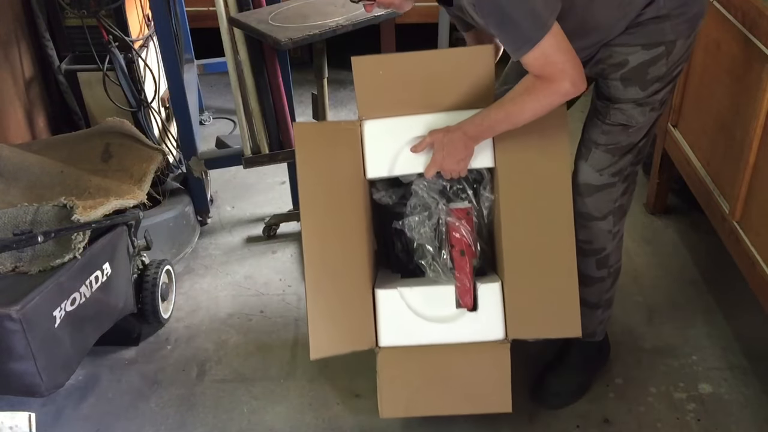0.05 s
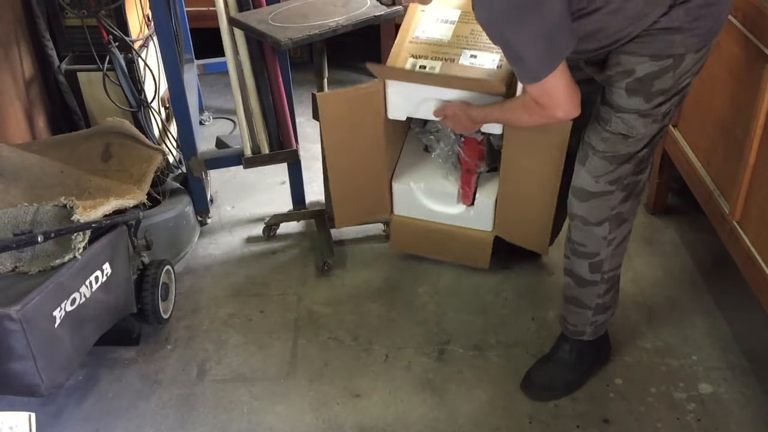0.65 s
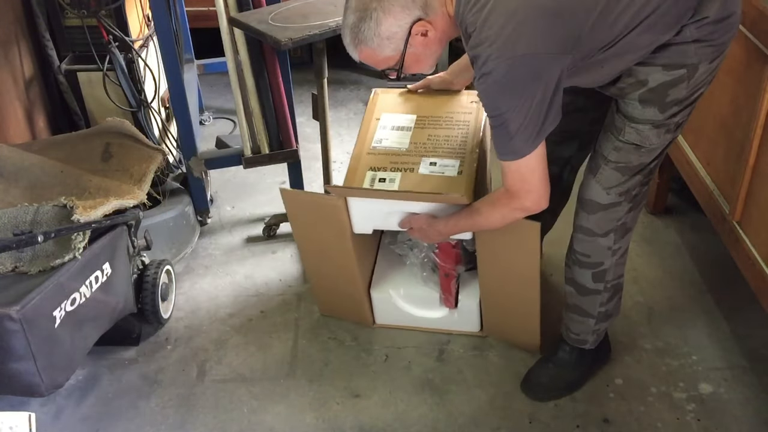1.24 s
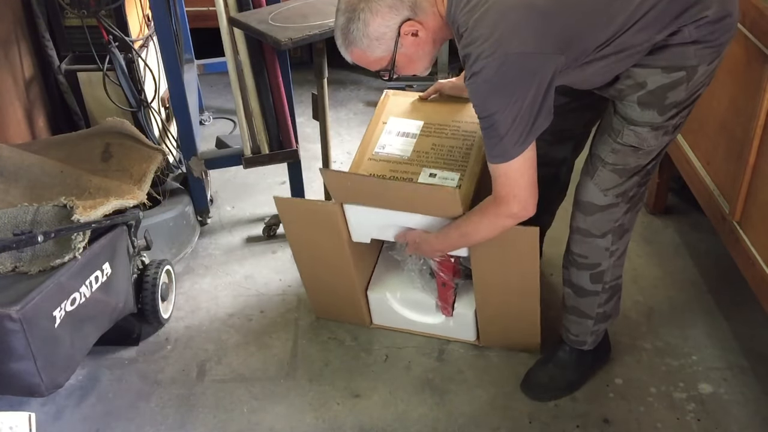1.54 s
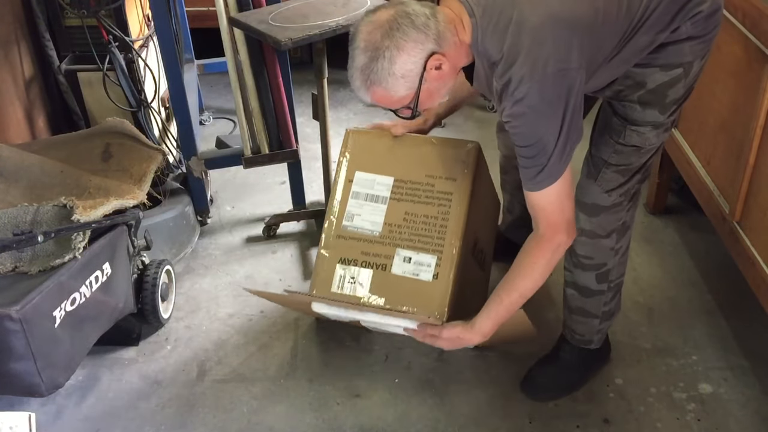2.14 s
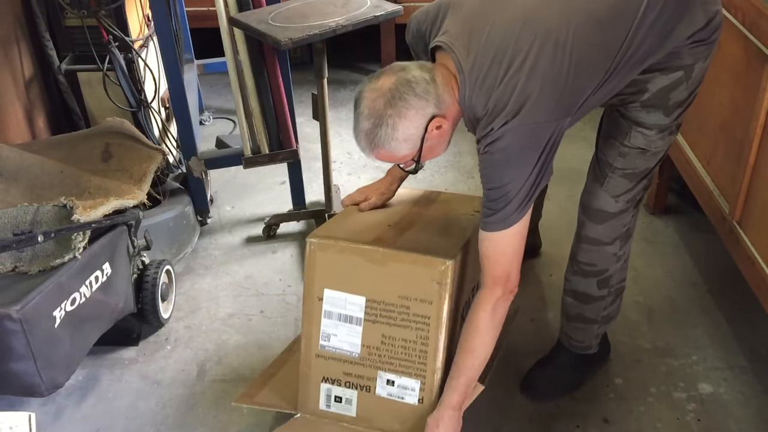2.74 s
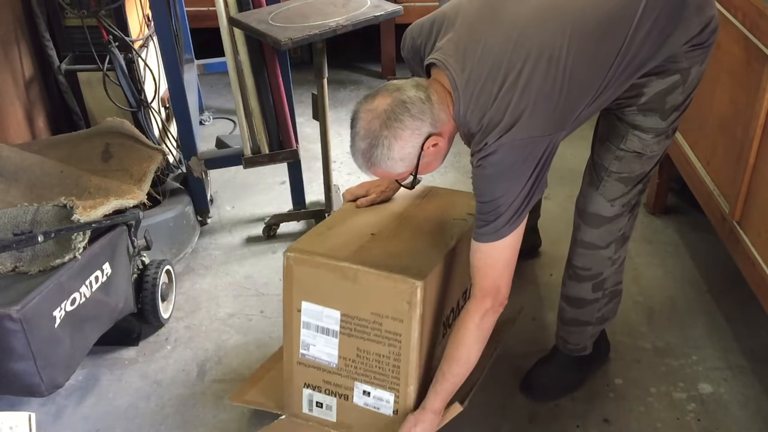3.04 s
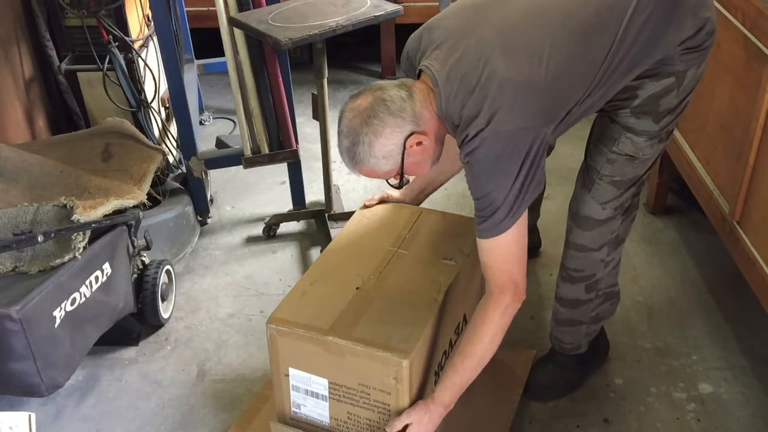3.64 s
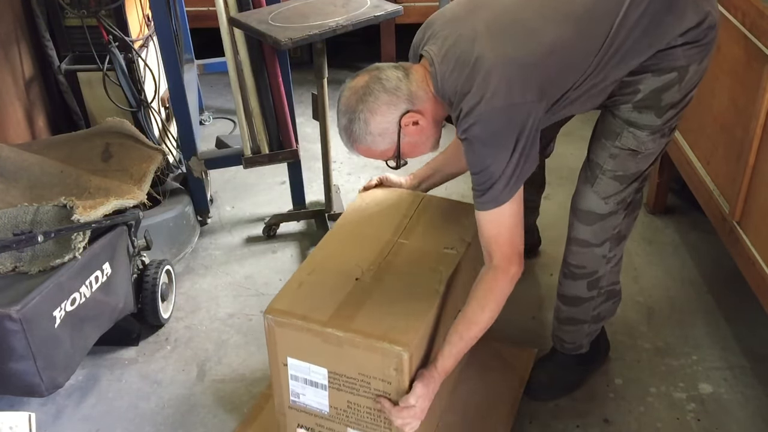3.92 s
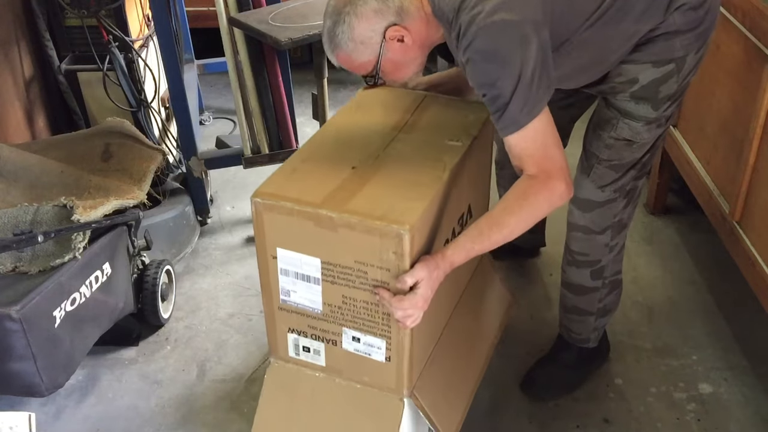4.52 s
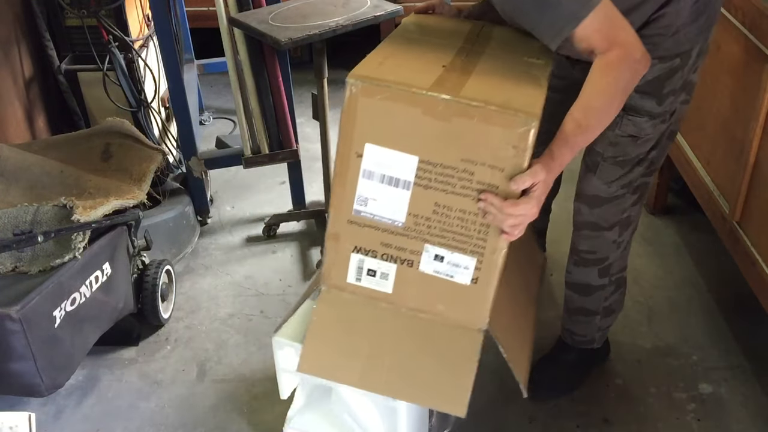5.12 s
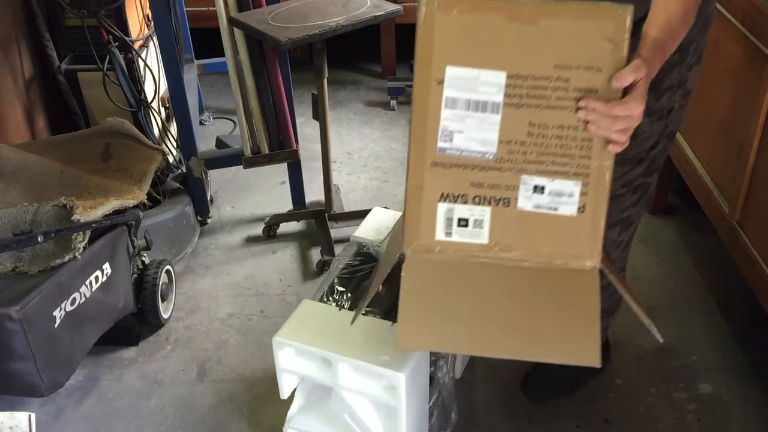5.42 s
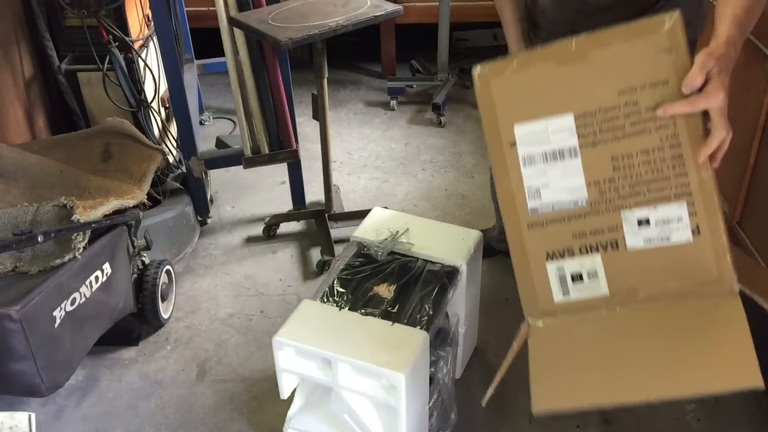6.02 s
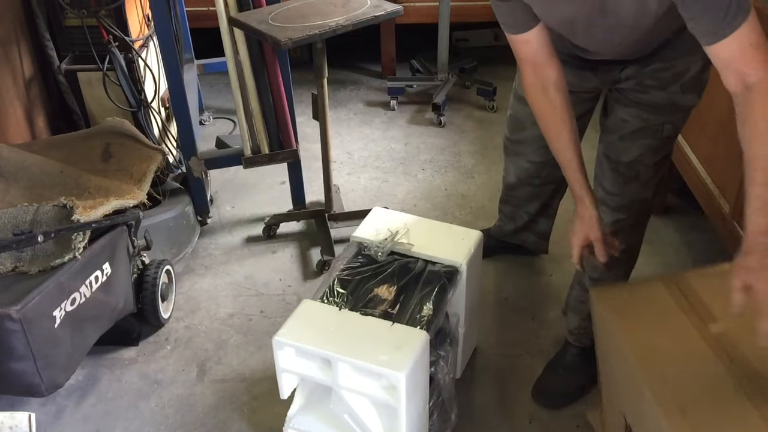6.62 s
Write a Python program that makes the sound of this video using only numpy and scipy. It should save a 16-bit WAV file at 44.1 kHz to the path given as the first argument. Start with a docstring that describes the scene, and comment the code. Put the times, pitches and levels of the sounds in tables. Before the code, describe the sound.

Close up in a small room, cardboard drags on concrete with dry rasps, knocks and sharp cracks as a packed box is turned over. Two heavy thumps stand out as the contents settle, followed by a rubbing hiss of foam sliding out of the box. Faint, thin high tones flutter briefly, the handling goes quiet, and the empty carton lands with a scrape and a few dull, hollow bumps.

```python
"""Unpacking a machine

A machine packed in polystyrene foam is tipped over in its carton on a workshop floor, and the carton is
pulled off. Flaps scrape on concrete and foam hisses along cardboard: countless tiny slips blur into
noise. The settling load thumps the walls, stiff edges snap, and the empty carton is set down.
Thin, high tones flutter briefly near the end. One close microphone, a small room."""
import sys
import numpy as np
from scipy import signal
from scipy.fft import rfft, irfft, next_fast_len
from scipy.io import wavfile
from scipy.ndimage import uniform_filter1d, map_coordinates

SR = 44100
rng = np.random.default_rng(int(sys.argv[2]) if len(sys.argv) > 2 else 0)


def generate_wav(sig):
    """Save sig (samples, or channels by samples) to the path in sys.argv[1] as 16-bit PCM at SR."""
    pcm = np.round(np.clip(np.atleast_2d(sig).T, -1, 1) * 32767).astype(np.int16)
    wavfile.write(sys.argv[1], SR, pcm)


N = 302509
TOP_HZ = 15800
TIME = np.arange(N) / SR
AGE = np.arange(SR // 2) / SR  # seconds since one short sound began
PUSH_TIME = np.arange(N * 1000 // SR + 2) / 1000  # pushes change slowly: one step a millisecond


def amp(db):
    """Turn decibels into a gain."""
    return 10 ** (np.asarray(db) / 20)


def unit(x):
    """Scale a sound to an average power of 1."""
    return x / np.sqrt(np.mean(x ** 2) + 1e-20)


def along(points, hz):
    """Read between (frequency, value) points on a log frequency axis."""
    f, values = np.transpose(points)
    return np.interp(np.log(hz + 1), np.log(f + 1), values)


def wobble(rate):
    """A smooth curve through `rate` random values a second."""
    return map_coordinates(rng.standard_normal(int(N * rate / SR) + 4), [TIME * rate])


def filtered(x, response):
    """Scale and delay each frequency f of a sound by response(f)."""
    size = next_fast_len(len(x) + SR // 4)
    return irfft(rfft(x, size) * response(np.fft.rfftfreq(size, 1 / SR)), size)[:len(x)]


def resonance(f, hz, width):
    """The response of something that rings at hz, with gain 1 there."""
    return 1j * f * width / (hz * hz - f * f + 1j * f * width)


def add(track, start, sound):
    """Mix a sound into the track, `start` seconds in."""
    part = track[max(0, round(start * SR)):][:len(sound)]
    part += sound[:len(part)]


def stroke(start, rise, hold, fade):
    """The gain of one push or swell: it rises, holds, then drops 20 dB in each fade time."""
    age = PUSH_TIME - start
    speed = np.sin(np.pi / 2 * np.clip(age / rise, 0, 1)) ** 2
    return speed * amp(-20 * np.clip((age - rise - hold) / fade, 0, 10))


# the tone of the workshop's still air: f/Hz, relative level/dB
AIR_TONE = [(15, -48), (25, -2.5), (64, 12), (216, -0.5), (449, -14.5), (812, -16), (2200, -31),
            (3880, -19), (4950, -29), (5980, -21), (15800, -20)]
def air():
    """Still air makes a faint, steady noise, mostly low."""
    return amp(-68.0) * unit(filtered(rng.standard_normal(N), lambda f: amp(along(AIR_TONE, f))))


# how long the room rings: f/Hz, time to fade by 60 dB (t60)/s
ROOM_DECAY = [(100, 0.91), (300, 0.41), (1000, 0.3), (4000, 0.13), (14000, 0.3)]
def room_echo(sound, early_db, early_t60):
    """The echo of a sound: floor and near furniture answer first, then the whole workshop."""
    hz, t, spectrum = signal.stft(rng.standard_normal(len(AGE)), SR, nperseg=256)
    decay = amp(-60 * t / along(ROOM_DECAY, hz)[:, None])
    tail = signal.istft(spectrum * decay, SR, nperseg=256)[1][:len(AGE)]
    tail = tail * (1 + amp(early_db - 60 * AGE / early_t60)) * (AGE > .002)
    return signal.fftconvolve(sound, tail / np.linalg.norm(tail))[:len(sound)]


# thin, high tones: f/Hz, relative level/dB, start/s, end/s
HIGH_TONES = [(3000, -59, 5.52, 5.62), (3970, -59, 5.55, 5.62), (4390, -59, 5.41, 5.63),
              (5580, -49.5, 5.48, 5.62), (6110, -52.5, 5.45, 5.65), (8920, -55.5, 5.42, 5.54),
              (9700, -59.5, 5.42, 5.64), (10200, -58, 5.54, 5.63), (11430, -56.5, 5.41, 5.62),
              (11972, -57, 5.54, 5.62), (12941, -65, 5.4, 5.62), (14100, -66, 5.48, 5.62),
              (14950, -61, 5.5, 5.61)]
def high_tones():
    """Thin, high tones with a raspy edge flutter briefly near the end."""
    track = np.zeros(N)
    rise_s = 0.023
    for hz, db, start, end in HIGH_TONES:
        swell = np.interp(AGE, PUSH_TIME, stroke(0, rise_s, hold=end - start - rise_s, fade=0.043))
        tone = np.sin(2 * np.pi * hz * AGE)
        rasp = unit(filtered(rng.standard_normal(len(AGE)), lambda f: resonance(f, hz, width=220) ** 3))
        flutter_db = 3 * wobble(55.6)[:len(AGE)]
        add(track, start, amp(db - 1 + flutter_db) * swell * (tone + amp(-5) * rasp))
    return track


# hollow scuffs of the flaps: t/s, hold/s, level/dB, f/Hz
FLAP_SCUFFS = [(0.07, 0.11, -53, 1258), (0.447, .07, -49, 2436), (0.9, 0.11, -43, 1360),
               (1.475, 0.028, -40.5, 1340), (1.935, 0.014, -48, 1074), (2.32, 0.018, -42.5, 1100),
               (2.719, 0.032, -45.5, 890)]
def scuffs():
    """A dragged edge chatters and makes its flap ring; each flap has its own pitch."""
    track = np.zeros(N)
    width_hz, overtone = 75, 1.8
    for start, hold, db, hz in FLAP_SCUFFS:
        chatter = rng.standard_normal(len(AGE))
        flap = lambda f: resonance(f, hz, width_hz) - amp(-8.5) * resonance(f, overtone * hz, width_hz)
        swell = np.interp(AGE, PUSH_TIME, stroke(0, rise=0.021, hold=hold, fade=0.1))
        add(track, start, amp(db) * swell * unit(filtered(chatter, flap)))
    return track


# the notes the carton's panels ring at: f/Hz, relative level/dB, t60/s
PANEL_NOTES = [(65.6, 4.5, 0.027), (139, 1, 0.13), (164.6, -5, 0.16), (194.8, 0, 0.088), (263, 2, 0.094),
               (331.6, -6, 0.22), (358.4, 3.5, 0.085), (458, -6, 0.087), (594, -0.5, 0.14),
               (703, -1.5, 0.1), (842, -3, 0.12), (1027, 0, 0.13), (1347, -3.5, 0.13)]
# soft, heavy blows: t/s, peak level/dB, f/Hz, bandwidth as a multiple of f, echo/dB
LOAD_THUMPS = [(0.001, -36.5, 328, 0.53, -5), (0.216, -41, 330, 2, 4), (0.365, -50, 300, 2.2, 4),
               (0.498, -34, 400, 1.4, 2), (0.975, -33, 242, 0.48, -6), (1.008, -26.5, 223, 0.75, -5.5),
               (1.022, -29.5, 626, 0.35, -7), (1.112, -27, 261, 1.1, -17), (1.173, -27, 215, 1.1, 2),
               (1.235, -26.5, 620, 0.85, -7), (1.249, -23.5, 300, 1.7, -8), (1.368, -30.5, 353, 0.88, -8),
               (1.492, -24, 376, 0.96, -7.5), (1.8, -42, 277, 0.36, 6), (2.005, -41, 190, 0.77, -4),
               (2.87, -36, 273.5, 2.1, 2), (3.345, -29, 250, 1.8, 0), (3.386, -14, 268, 2.04, 1),
               (3.43, -22, 131, 1.6, -1), (3.508, -28, 126, 1.2, -16), (3.74, -30, 228, 1.4, -8),
               (3.878, -42.5, 150, 0.81, -6), (3.948, -14, 360, 2, -16), (3.949, -20.5, 160, 0.71, -19),
               (4.012, -25, 220, 1.2, -8), (4.04, -29, 270, 1.2, -8), (4.457, -20, 392, 1.1, -11),
               (4.685, -40.5, 129, 1.5, -1), (4.755, -27.5, 800, 1.5, -3.5), (5.089, -50.5, 453, 1.92, 5),
               (5.403, -36.5, 450, 2, 9), (5.46, -36, 250, 2.1, 6), (5.524, -27.5, 310, 2.2, 2.5),
               (6.116, -41, 165, 2.1, 2), (6.178, -38.5, 531, 1.08, 4), (6.302, -46, 79.6, 1.9, -9),
               (6.648, -24, 200, 0.99, 0.5), (6.769, -19, 220, 2.1, 3.5), (6.802, -13, 131, 1.4, -7),
               (6.842, -14.5, 177, 2, -7)]
def thumps():
    """The load shifts against the walls: panels ring, board crushes, and a softer blow sounds lower."""
    track = np.zeros(N)
    attack = 1 - np.exp(-AGE / 0.00035)
    for start, db, hz, breadth, echo_db in LOAD_THUMPS:
        # one blow starts every note at once, neighbours in opposite directions
        ring = np.zeros(len(AGE))
        for k, (note_hz, note_db, t60) in enumerate(PANEL_NOTES):
            decay = amp(note_db + rng.normal(0, 4.26) - 60 * AGE / t60)
            ring += (-1) ** k * decay * np.sin(2 * np.pi * note_hz * AGE)
        crush = amp(22.0 - 60 * AGE / 0.091) * rng.standard_normal(len(AGE))
        blow = filtered((ring + crush) * attack, lambda f: resonance(f, hz, breadth * hz) ** 2)
        blow = blow + amp(echo_db) * room_echo(blow, early_db=3.5, early_t60=0.19)
        add(track, start, amp(db) * blow / np.abs(blow).max())
    return track


def panels(f, width_hz, ring_db):
    """Cardboard boosts the frequencies near its panels' notes."""
    peaks = sum(amp(db) * abs(resonance(f, hz, width_hz)) ** 2 for hz, db, _ in PANEL_NOTES)
    return 1 + amp(ring_db) * peaks


# hard knocks of flaps and foam: t/s, crack level/dB, f/Hz, bandwidth as a multiple of f, echo/dB
EDGE_SNAPS = [(1.107, -16.5, 3840, 0.98, 7), (1.376, -16.5, 3500, 0.99, 2.5), (1.483, -13, 2800, 0.21, 0.5),
              (1.4859, -14, 1290, 0.48, -2), (1.509, -19, 5500, .5, -6.5), (1.7575, -22, 4260, 1, 0),
              (1.914, -34, 2280, 0.98, 4), (1.952, -27, 1330, 0.63, 0.5), (2.104, -19.5, 3610, 0.26, -8),
              (3.729, -33.5, 3030, 1, 11), (3.947, -8.5, 1200, 0.25, -6), (3.9472, -11, 3160, 0.5, -2),
              (3.949, -17, 1033, 0.034, -13.5), (3.96, -19, 1100, 0.8, 4), (3.979, -20, 850, 0.74, -3.5),
              (3.998, -22, 1200, 0.76, 3.5), (4.77, -25, 2345, 0.39, 3), (5.404, -48, 1100, 1, -2),
              (6.117, -45, 3050, .73, 10), (6.28, -35, 5500, 0.94, 1.5), (6.649, -44, 2510, 0.87, 15)]
def snaps():
    """A stiff edge lets go and slaps: a sharp crack, then an echo that rings like cardboard."""
    track = np.zeros(N)
    for start, db, hz, breadth, echo_db in EDGE_SNAPS:
        crack = filtered(signal.unit_impulse(len(AGE)), lambda f: resonance(f, hz, breadth * hz))
        # the time in contact limits how high the crack reaches
        lowpass = signal.butter(3, min(3.34 * hz, TOP_HZ), fs=SR, output="sos")
        crack = signal.sosfilt(lowpass, crack)
        crack = crack / np.abs(crack).max()
        echo = room_echo(crack, early_db=6.0, early_t60=0.026)
        echo = filtered(echo, lambda f: panels(f, width_hz=46, ring_db=7.0))
        add(track, start, amp(db) * (crack + amp(echo_db) * echo))
    return track


def catches(lowest_hz, per_second=240, spread_db=5.5):
    """Foam beads or ridges of board catch and let go: tiny clicks, each with its own pitch."""
    t = AGE[:SR // 250]
    track = np.zeros(N)
    for when, pitch, size in rng.random((int(per_second * N / SR), 3)):
        hz = lowest_hz * 6.5 ** pitch
        click = np.sin(2 * np.pi * hz * t) * np.exp(-hz * t / 2.0)
        click_db = spread_db * min(-np.log(1 - size), 3)  # many small clicks, few big ones
        add(track, when * N / SR, amp(click_db) * click)
    return unit(track)


# the tone of rubbed board and foam: f/Hz, relative level/dB
FRICTION_TONE = [(50, -25.5), (100, -7.5), (200, 1.5), (330, 2), (460, -1), (950, 0), (1600, -1),
                 (2700, -6), (5600, -9.5), (9000, -13), (12300, -16.5), (15800, -14)]
def slips(low_hz, high_hz, steep, rough, patchy_db, ring=lambda f: 1):
    """Tiny slips merge into a band of noise; the touching spot wanders, so resonances come and go."""
    def band(f):
        edges = (1 + (low_hz / f) ** steep) * (1 + (f / high_hz) ** steep)
        return amp(along(FRICTION_TONE, f)) / np.sqrt(edges)

    noise = rng.standard_normal(N) * np.exp(rough * wobble(250))
    spectrum = signal.stft(noise, nperseg=1024)[2]
    patches = uniform_filter1d(rng.standard_normal(spectrum.shape), size=5, axis=0)  # blur in pitch
    patches = uniform_filter1d(patches, size=7, axis=1)  # blur in time
    noise = signal.istft(spectrum * amp(patchy_db * unit(patches)), nperseg=1024)[1][:N]
    return unit(filtered(noise, lambda f: band(f + 1) * ring(f)))


def contact_power(strokes, shares):
    """The power that pushes feed into each band of noise; a brighter push favours the upper bands."""
    share_db, lean = np.transpose(shares)
    gains = np.array([amp(db + share_db + lean * bright_db) for *_, db, bright_db in strokes])
    pushes = np.array([stroke(*timing) for *timing, _, _ in strokes])
    return gains.T ** 2 @ pushes ** 2


# board scrapes on concrete and on itself: t/s, rise/s, hold/s, fade/s, relative level/dB, brightness/dB
BOARD_SCRAPES = [(0.0, 0.00092, 0.11, 0.12, -47, -3), (0.878, 0.039, .04, 0.27, -45, -3.5),
                 (0.94, 0.019, 0.08, 0.22, -39.5, -3.5), (1.104, 0.017, 0.26, 0.21, -38, -2),
                 (1.23, 0.031, .23, 0.28, -36, 1), (1.9, 0.021, 0.11, 0.16, -54, 4.5),
                 (2.0, 0.074, 0.11, 0.37, -40.5, 0.5), (2.16, 0.039, 0.041, 0.17, -38.5, 2),
                 (2.31, 0.014, 0.017, 0.076, -40, -0.5), (2.39, 0.013, 0.42, 0.2, -51.5, -14.5),
                 (2.72, 0.0079, 0.031, 0.32, -41, -1), (2.84, 0.08, 0.38, 0.34, -41.5, -2),
                 (2.94, 0.049, 0.091, 0.17, -36, 1), (3.18, 0.034, 0.011, 0.12, -42, 1.5),
                 (3.26, 0.068, 0.062, 0.11, -41, 2), (3.375, 0.025, 0.045, 0.18, -31.5, -3.5),
                 (3.46, 0.042, 0.085, 0.21, -38, -1.5), (3.828, 0.026, 0.0063, 0.13, -47.5, 0.5),
                 (3.95, 0.0086, 0.083, 0.49, -40, -1), (4.43, 0.032, 0.028, 0.14, -44.5, -30.5),
                 (4.75, 0.011, 0.024, 0.065, -49.5, 0), (5.385, 0.02, 0.12, 0.22, -55, 2),
                 (5.76, 0.15, 0.28, 0.16, -65.5, 0), (6.13, 0.052, 0.0081, 0.12, -61.5, -15),
                 (6.76, 0.12, 0.02, 0.086, -29.5, -9.5)]
# foam slides inside the carton: same columns
FOAM_SLIDES = [(0.437, 0.055, 0.014, 0.1, -42.5, -12.5), (0.995, 0.029, 0.0035, 0.044, -36, 3.5),
               (1.04, .015, 0.034, .05, -51, 3.5), (1.106, 0.0034, 0.0068, 0.32, -46.5, 7),
               (1.22, 0.12, 0.034, 0.07, -32, 4.5), (1.41, 0.019, 0.055, 0.085, -48, 11),
               (1.75, .02, .16, .1, -67, 4), (1.945, 0.012, 0.091, 0.074, -55.5, 6.5),
               (2.36, 0.14, 0.27, 0.17, -50, 1), (2.96, 0.045, 0.041, .08, -47, 1.5),
               (3.415, 0.011, 0.013, 0.045, -42.5, 4.5), (3.97, 0.1, 0.48, 0.22, -44.5, 1.5),
               (4.38, 0.095, 0.094, 0.25, -39, -2), (4.58, 0.055, 0.024, 0.12, -46.5, 4),
               (4.74, 0.044, 0.045, 0.11, -41.5, -3), (4.8, 0.069, 0.045, 0.081, -42.5, 3.5),
               (5.455, 0.031, 0.014, 0.045, -52.5, 3), (6.1, 0.007, 0.11, 0.097, -68, 5.5),
               (6.58, 0.035, 0.12, 0.09, -59, 2), (6.646, 0.013, 0.012, 0.056, -50.5, 1.5),
               (6.713, 0.02, .03, 0.091, -45.5, 1), (6.76, .014, 0.099, .1, -41, 2.5)]
# how each material feeds drone, rasp, rub and hiss (a row each): level/dB, dB added per dB of brightness
BOARD_SHARES = [(-9, -0.64), (-0.5, 0), (-3, 1.5), (-10.5, 2.5)]
FOAM_SHARES = [(-10, 0.069), (-10.5, 0.11), (0, -0.16), (-0.5, 1)]
# the carton shifting in the hands: level/dB of drone, rasp, rub and hiss
HANDLING_DB = [-72, -73, -74, -81.5]
def sliding():
    """Board drones and rasps, foam rubs and hisses; one uneven push drives them all."""
    power = contact_power(BOARD_SCRAPES, BOARD_SHARES) + contact_power(FOAM_SLIDES, FOAM_SHARES)
    sway = amp(4.5 * wobble(7.3))
    gains = np.sqrt([np.interp(TIME, PUSH_TIME, pushed) + (amp(db) * sway) ** 2
                     for pushed, db in zip(power, HANDLING_DB)])
    drone = slips(low_hz=105, high_hz=630, steep=4.2, rough=0.15, patchy_db=3.0,
                  ring=lambda f: panels(f, width_hz=8.1, ring_db=-10.5))
    rasp = slips(low_hz=486, high_hz=2000, steep=4.05, rough=0.21, patchy_db=2.0,
                 ring=lambda f: panels(f, width_hz=44, ring_db=-25.5))
    rub = slips(low_hz=2460, high_hz=5460, steep=6.1, rough=0.13, patchy_db=2.0)
    hiss = slips(low_hz=4760, high_hz=14000, steep=11.0, rough=0.15, patchy_db=2.5)
    beads = catches(lowest_hz=1807)
    ridges = filtered(catches(lowest_hz=600), lambda f: resonance(f, hz=1410, width=1600))
    rub = unit(rub + amp(-11) * beads)
    rasp = unit(rasp + amp(-7) * ridges)
    friction = np.sum(gains * [drone, rasp, rub, hiss], axis=0) * amp(0.26 * wobble(35))
    return friction + amp(-9.0) * room_echo(friction, early_db=17.5, early_t60=0.12)


# brief dull instants in the sliding noise: t/s, length/s, depth/dB, above f/Hz
DULL_MOMENTS = [(1.042, 0.011, 8.5, 2000), (1.41, 0.014, 6, 2200), (1.67, 0.017, 13, 6800),
                (2.456, 0.022, 9, 6100), (3.153, 0.018, 10.5, 6500), (3.4, 0.0071, 19, 3240)]
def treble_dips(sound):
    """The treble drops away for an instant, here and there."""
    hz, t, spectrum = signal.stft(sound, SR, nperseg=128)
    cut_db = 0
    for middle, length, db, above_hz in DULL_MOMENTS:
        treble = 1 / (1 + (above_hz / (hz + 1)) ** 6)
        moment = np.exp(-(2 * (t - middle) / length) ** 4)
        cut_db += db * np.outer(treble, moment)
    return signal.istft(spectrum * amp(-cut_db), SR, nperseg=128)[1][:N]


def scene():
    """Everything reaches one microphone, the same in both channels."""
    mono = treble_dips(sliding()) + scuffs() + thumps() + snaps() + high_tones() + air()
    return np.array([mono, mono])


# where the microphone hears less well: f/Hz, width/Hz, level/dB
MIC_NOTCHES = [(4890, 260, -4.5), (7660, 390, -2.5), (10470, 390, -4.5)]
def record(dry):
    """The microphone has a few dips in the treble, and nothing above TOP_HZ gets through."""
    colour = lambda f: amp(sum(db * np.exp(-((f - hz) / width) ** 2) for hz, width, db in MIC_NOTCHES))
    return np.array([filtered(channel, lambda f: colour(f) * (f < TOP_HZ)) for channel in dry])


dry = scene()
out = record(dry)
generate_wav(out)
```